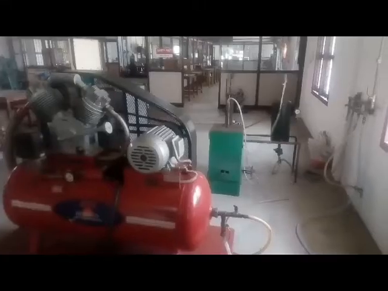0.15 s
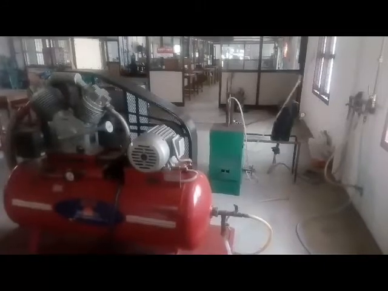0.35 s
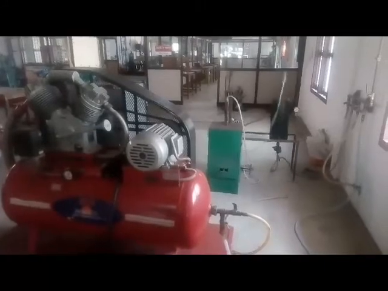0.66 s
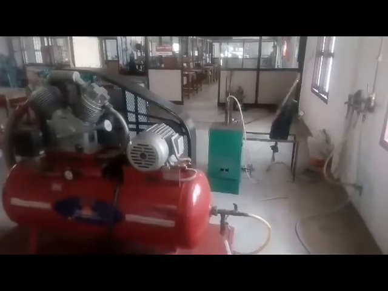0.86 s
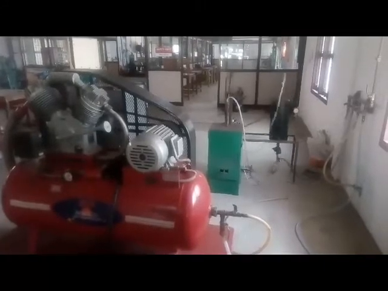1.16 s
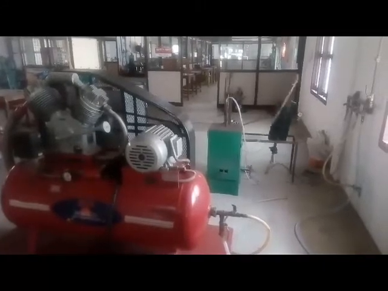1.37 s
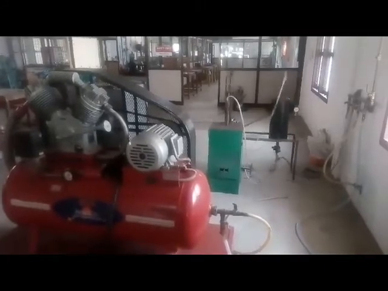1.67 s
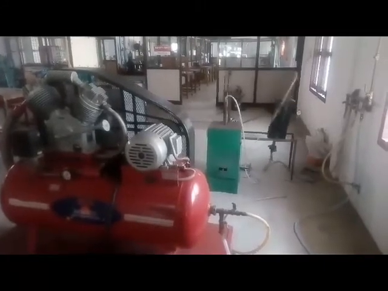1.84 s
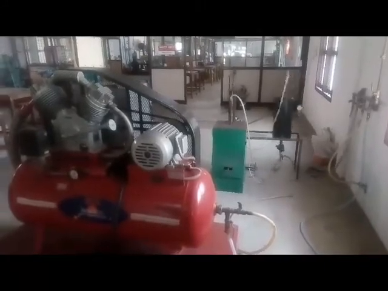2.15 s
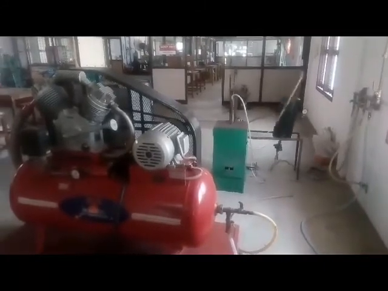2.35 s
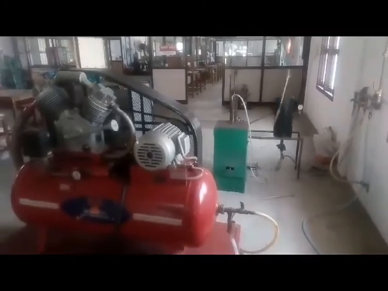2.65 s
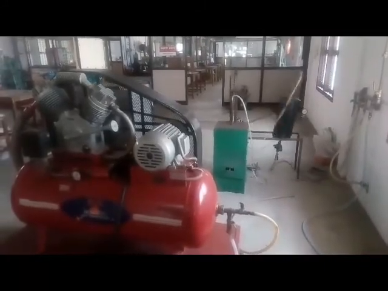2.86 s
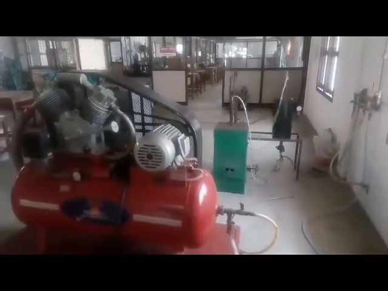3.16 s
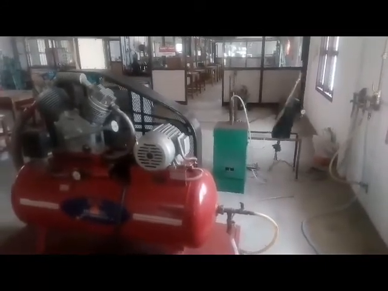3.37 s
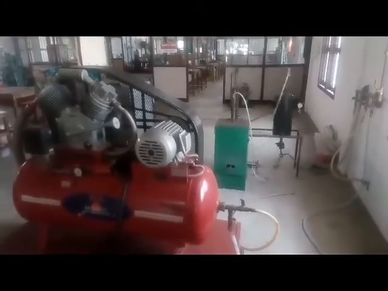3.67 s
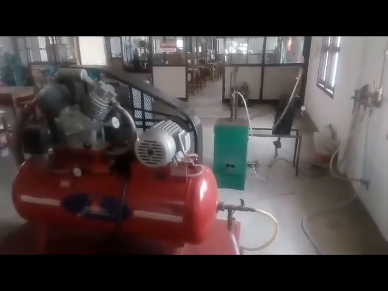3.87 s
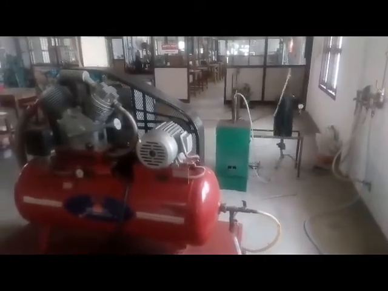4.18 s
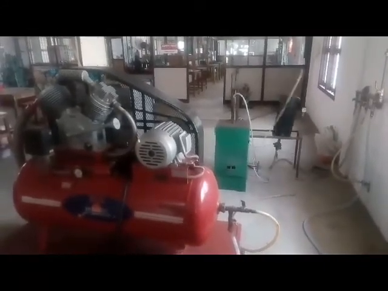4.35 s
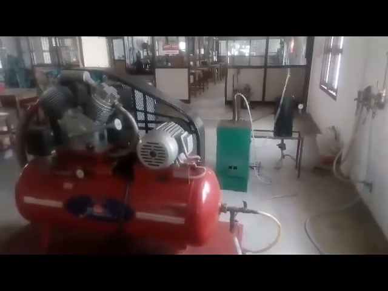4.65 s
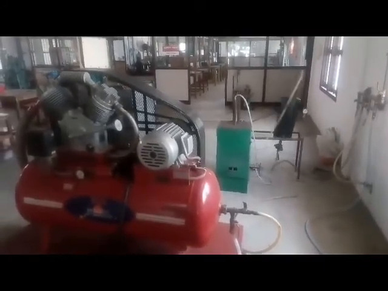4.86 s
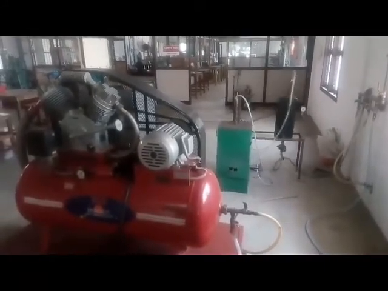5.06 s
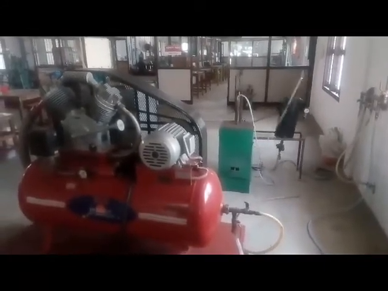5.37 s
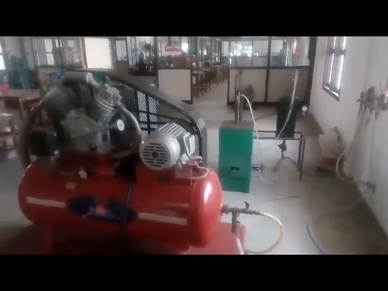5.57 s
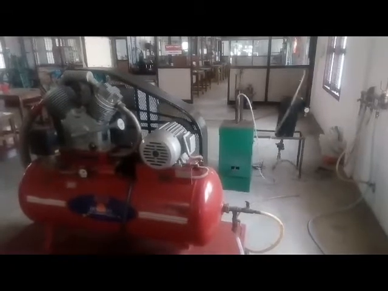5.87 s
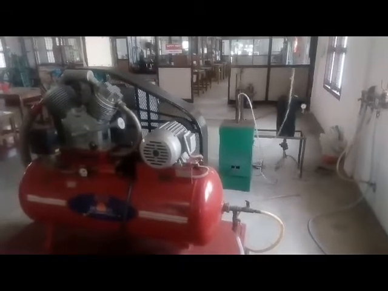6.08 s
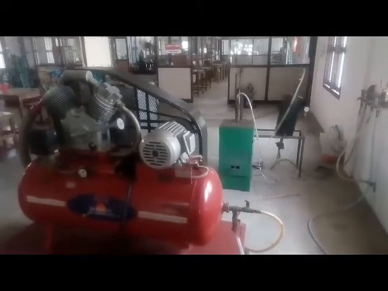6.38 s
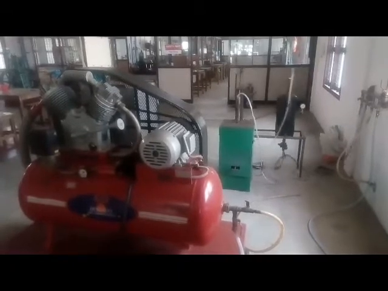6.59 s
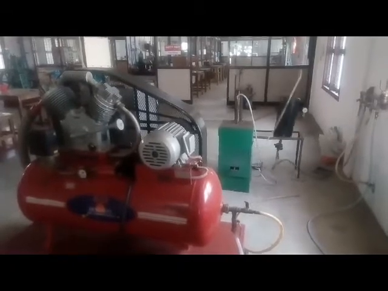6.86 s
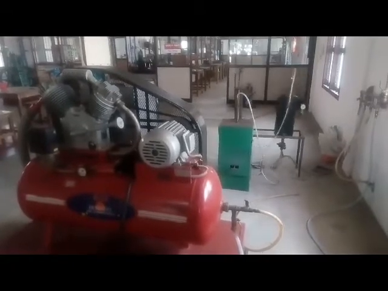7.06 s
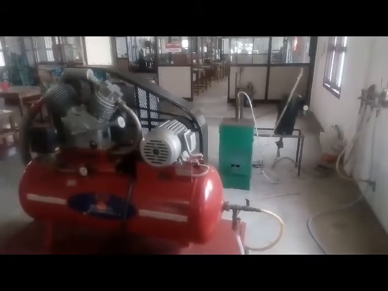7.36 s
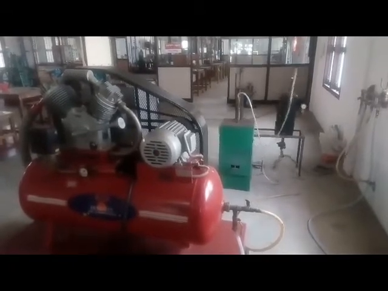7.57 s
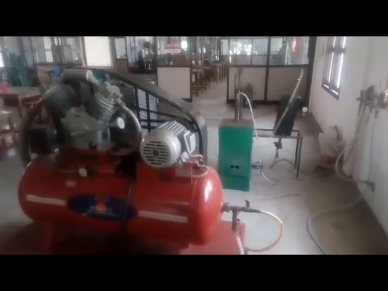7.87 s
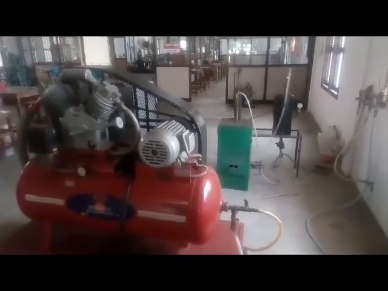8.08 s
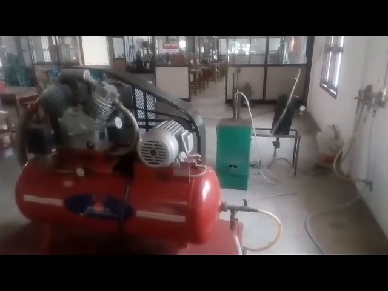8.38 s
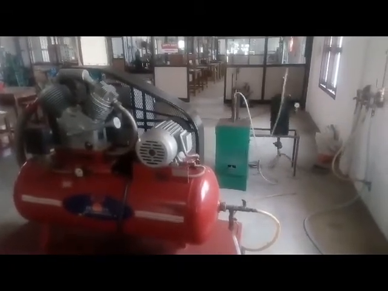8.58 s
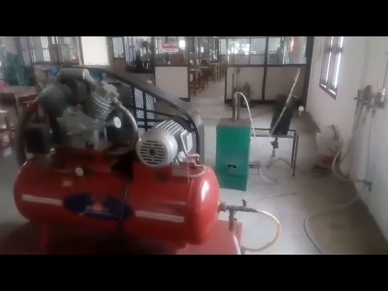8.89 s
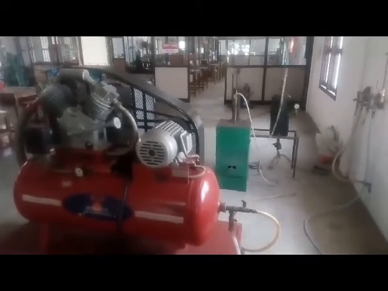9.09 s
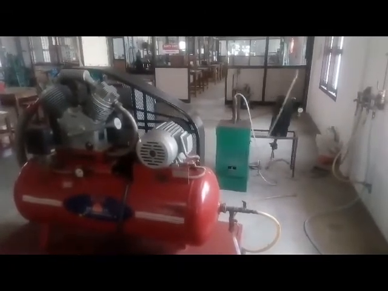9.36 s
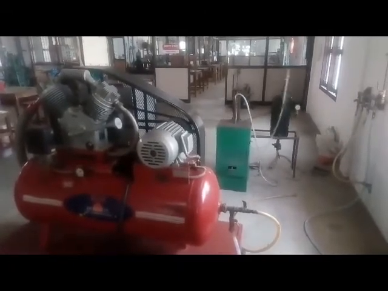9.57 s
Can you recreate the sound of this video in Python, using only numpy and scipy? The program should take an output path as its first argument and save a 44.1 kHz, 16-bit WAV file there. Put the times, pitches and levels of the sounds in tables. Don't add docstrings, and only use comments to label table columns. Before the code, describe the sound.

A belt-driven air compressor runs nonstop close by in a large hard-walled laboratory. Its slack belt taps and slaps a sheet-metal guard in a quick repeating lap: two sharp rattling taps, then a duller slap with a dragging rub. Panels boom hollowly, mesh ticks, and faint squeaks appear. Piston drone, motor hum and fan rush stay steady underneath. The sound leans left, with bright, slightly thinned treble.

```python
import sys
import numpy as np
from scipy import signal
from scipy.fft import rfft, irfft
from scipy.io import wavfile
from scipy.ndimage import uniform_filter1d

SR = 44100
rng = np.random.default_rng(int(sys.argv[2]) if len(sys.argv) > 2 else 0)


def unload_audio(sound):
    columns = np.transpose(np.atleast_2d(sound))
    steps = np.round(np.clip(columns, -1, 1) * 32767)
    wavfile.write(sys.argv[1], SR, steps.astype(np.int16))


def rack_gain(trim_db):
    fader = np.asarray(trim_db, float)
    return 10 ** (fader / 20)


N = 429093
T = np.arange(N) / SR
HZ = np.maximum(np.arange(N // 2 + 1) * SR / N, 1)

# (frequency [Hz], likeness [-1 to 1])
LIKENESS = [(40, 1), (130, 0.94), (290, 1), (630, 0.63), (900, 0.9), (1400, -0.47), (3000, 0.16),
            (14000, 0.03)]


def rms_one(x):
    return x / np.sqrt(np.mean(x ** 2) + 1e-20)


def at_hz(points, hz=HZ):
    points = np.array(points)
    return np.interp(np.log(hz), np.log(points[:, 0]), points[:, 1])


def in_time(points):
    return np.interp(T, *np.transpose(points))


def colour(x, gain):
    return irfft(rfft(x) * gain, N)


def drift(rate_hz):
    knots = rng.standard_normal(int(N / SR * rate_hz * 2) + 2)
    return np.interp(T * rate_hz * 2, np.arange(len(knots)), knots) * 2.0


def stereo(mid, side):
    alike = np.clip(at_hz(LIKENESS), -.9, .99)
    mid = colour(mid, np.sqrt(1 + alike))
    side = colour(side, np.sqrt(1 - alike))
    return np.array([mid + side, mid - side]) / 2 ** .5


def leaning(x):
    # (frequency [Hz], difference [dB])
    lean = [(60, 10), (130, 2.5), (290, 5), (630, 9), (1380, 1.5), (3010, 4.5), (6590, -2.5), (14400, 0.5)]
    half_each_way = np.array([[.5], [-.5]])
    return colour(x, rack_gain(at_hz(lean) * half_each_way))


def ring(x, hz, t60):
    r = rack_gain(-60 / (t60 * SR))
    w = 2 * np.pi * hz / SR
    return signal.lfilter([0, np.sin(w)], [1, -2 * r * np.cos(w), r * r], x)


def add(out, s, shape):
    i = max(round(s * SR), 0)
    out[i:i + len(shape)] += shape[:len(out) - i]


def lap_pattern():
    # (time [s], rattle [dB], thud [dB], clack [dB], ping [dB])
    first_taps = [(0.044, -5, -4, -20, -24), (0.539, -4, -5, -2, -28), (1.043, -6.5, -9, -1, -7),
                  (1.533, -4.5, -5, -12, -18), (2.033, -3.5, -11, -8, -12), (2.536, -6.5, -23, -19, -2.5),
                  (3.036, -6, -6, -1, -22), (3.535, -8, -12, -18, -3), (4.043, -7.5, -18, -19, -6),
                  (4.537, -6.5, -21, -22, -24), (5.044, -6.5, -5, -14.5, -11), (5.557, -6, -11, -23, -6),
                  (6.048, -7, -7, -21, -9), (6.555, -5.5, -7, -19, -16), (7.052, -8, -14, -22, -17),
                  (7.56, -8.5, -31, -20, -9), (8.062, -3, -5, -17, -26), (8.546, -9, -27, -12, -27),
                  (9.052, -3.5, -19, -16, -10), (9.543, -4.5, -24, -13, -14)]
    # (time [s], rattle [dB], thud [dB], rebound [dB])
    second_taps = [(0.103, -6, -10, -13.5), (0.592, -11.5, -6, -9), (1.096, -9, -25, -10.5),
                   (1.584, -6.5, -17, -13), (2.092, -7.5, -3, -20), (2.59, -8, -29, -27),
                   (3.086, -8.5, -29, -23), (3.589, -7.5, -11, -17), (4.094, -8.5, -22, -6),
                   (4.591, -7, -0.5, -12), (5.095, -7.5, -26, -9), (5.613, -9, -11, -13.5),
                   (6.105, -7, -22, -13), (6.61, -10.5, -19, -15), (7.105, -9, -29, -8),
                   (7.612, -9, -13, -6.5), (8.116, -9, -13, -12), (8.595, -8.5, -25, -11.5),
                   (9.106, -11.5, -23, -12), (9.596, -9.5, -13, -10)]
    # (time [s], rattle [dB], thud [dB], clack [dB], ping [dB])
    slaps = [(0.304, -13, -0.5, -8, -8), (0.799, -10.5, -7, -22, -22), (1.295, -14.5, -2, -12, -7),
             (1.793, -13, 2, -17, -6), (2.295, -12.5, -4, -14, -22), (2.794, -12, -3, -23, -10),
             (3.297, -12.5, -3, -4, -9), (3.803, -13, -1.5, -20, -18), (4.307, -11, -24, -20, -7),
             (4.801, -11.5, -14, -18, -6), (5.311, -15.5, -18.5, -7, -17), (5.819, -12, -6, -15, -9),
             (6.309, -14, -6, -15, -23), (6.818, -11, -14, -23, -2.5), (7.314, -12.5, -9, -14, -8.5),
             (7.819, -12.5, -7, -10, -14), (8.313, -14.5, -16, -19, -18), (8.805, -14.5, -11, -17, -23),
             (9.308, -14, -20, -6.5, -14)]
    # (time [s], rattle [dB], panel boom [dB])
    slap_rubs = [(0.373, -6.5, -4), (0.866, -7.5, -32), (1.319, -6, -25), (1.37, -8.5, -1),
                 (1.88, -6.5, -23), (2.362, -8, -19), (2.881, -7.5, -17), (3.405, -10.5, -29),
                 (3.887, -6.5, -23), (3.943, -8.5, -13), (4.392, -6.5, -17), (4.883, -6, -18),
                 (5.369, -14.5, -18), (5.416, -7.5, -19), (5.454, -13, -22), (5.915, -7.5, -16),
                 (6.379, -8.5, -21), (6.46, -9.5, -11), (6.913, -7.5, -30), (7.377, -10.5, -15),
                 (7.415, -11, -12), (7.907, -9.5, -20), (7.977, -14, -14), (8.397, -5, -7),
                 (8.865, -8, -18), (8.908, -8.5, -15), (9.381, -5, -23)]
    chance_db = 3.5
    boom_db = (-19.5, -23, -11)
    second_ring_db = (-19, -16)
    rebound_s, rebound_boom_db = 0.045, 1.5
    flutter_s, flutter_db, flutter_boom_db = .058, -10, -34

    knocks = []
    for contact, rows in enumerate((first_taps, second_taps, slaps)):
        for row, luck in zip(rows, chance_db * rng.standard_normal((len(rows), 3))):
            clack_db, ping_db = luck[1:] + second_ring_db if rows is second_taps else row[3:]
            knocks.append((row[0], row[1], boom_db[contact] + luck[0], row[2], ping_db, clack_db, contact))

    rubs = slap_rubs + [(s + rebound_s, db, db + rebound_boom_db) for s, _, _, db in second_taps]
    luck = chance_db * rng.standard_normal((len(rubs), 2))
    rubs += [(s + flutter_s, db + flutter_db + a, flutter_boom_db + b)
             for (s, db, _), (a, b) in zip(rubs, luck)]
    return np.array(knocks), rubs


def contact_force(knocks, rubs, column, knock_s, rub_rise_s, rub_fall_s, bright=0, dull=False):
    # (brightness [dB], drag below the knock [dB], drag length [s])
    contacts = [
        (8, -16.5, 0.15),
        (1, -5.5, 0.063),
        (-3, -1.5, 0.11),
    ]
    power = np.zeros(N)
    t = T[:SR // 4]
    for row in knocks:
        bright_db, drag_db, drag_s = contacts[int(row[-1])]
        drag = 1 / (1 + (t / drag_s) ** 4)
        knock = drag if dull else rack_gain(bright * bright_db) * np.exp(-t / knock_s) + rack_gain(drag_db) * drag
        onset = 1 - np.exp(-t / .0018)
        add(power, row[0] - .0012, (rack_gain(row[column]) * onset * knock) ** 2)
    from_peak = t - 3 * rub_rise_s
    rub = np.exp(-np.where(from_peak < 0, from_peak / rub_rise_s, from_peak / rub_fall_s) ** 2)
    for row in rubs:
        add(power, row[0] - 3 * rub_rise_s, (rack_gain(row[column] - 2.5) * rub) ** 2)
    return np.sqrt(power)


def chatter(per_s, spread_db):
    sizes = rack_gain(spread_db * np.minimum(rng.exponential(1, N), 3)) * rng.choice([-1, 1], N)
    hits = rng.random(N) < per_s / SR
    return rms_one(sizes * hits + 1e-9)


def struck(force, modes, per_s):
    out = np.zeros((2, N))
    spots = [force * chatter(per_s, spread_db=3.0) for _ in range(4)]
    for k, (hz, left_db, right_db, t60) in enumerate(modes):
        alike = np.clip(at_hz(LIKENESS, hz), 0, 1)
        t60 = min(t60, .08)
        flare = rack_gain(1.3 * drift(12))
        here = ring(spots[k % 4] * flare, hz, t60) / np.sqrt(t60 * SR)
        if hz < 3200:
            unlike = np.roll(here, int(SR / hz / 4))
        else:
            unlike = np.roll(here, 3 + 2 * k) * (-1) ** k
        there = alike * here + np.sqrt(1 - alike ** 2) * unlike
        out += [rack_gain(left_db) * here, rack_gain(right_db) * there]
    return out


def guard(knocks, rubs):
    # (pitch [Hz], left [dB], right [dB], time to fall 60 dB [s])
    panels = [(723, -1.5, -1, 0.11), (760, -2.5, -6, 0.069), (812, -16, -7.5, 0.032), (1010, -5, -25, 0.01),
              (1507, -6.5, -18, 0.069), (1521, -1, -8, 0.086), (1544, 0, -4.5, 0.097)]
    # (pitch [Hz], left [dB], right [dB], time to fall 60 dB [s])
    mesh = [(1795, -8.5, -15, 0.023), (1954, -3.5, -18, 0.026), (2280, -2.5, -16, 0.046),
            (2664, 1, -8.5, 0.029), (2740, -1, -13, 0.011), (2790, -25, -5, 0.034),
            (2980, -28, -19.5, 0.023), (3384, -11.5, -6.5, 0.098), (3640, -1.5, -15, 0.019),
            (3813, -4.5, -5.5, 0.11), (3965, -9, -12, 0.024), (4186, -15, -6.5, 0.04),
            (4342, -1.5, -7, 0.029), (4780, -7, -11, 0.054), (5140, -9, -39, 0.029), (5430, -19, -14, 0.11)]
    # (frequency [Hz], level per Hz [dB])
    rattle_spectrum = [(290, -69), (500, -21), (646, -20.5), (765, 2.5), (1060, -13.5), (1510, -5),
                       (1670, -7), (2670, -9), (4450, -6.5), (6430, -14.5), (8190, -28), (12900, -32.5),
                       (14900, -45)]
    boom = np.hypot(contact_force(knocks, rubs, 2, .005, 0.0056, 0.023, dull=True), rack_gain(-20.0))
    rattle = np.hypot(contact_force(knocks, rubs, 1, 0.014, 0.019, 0.023), rack_gain(-25.0))
    sizzle = np.hypot(contact_force(knocks, rubs, 1, 0.011, 0.00089, 0.03, bright=0.98), rack_gain(-22.5))

    clicks = np.array([chatter(2500., spread_db=3.5), chatter(4000., spread_db=4.5)])
    treble = 1 / (1 + (6500 / HZ) ** 8)
    shape = rack_gain(at_hz(rattle_spectrum))
    shape = shape / np.sqrt(np.mean(shape ** 2))
    clatter = rack_gain(-7) * colour(rattle * rack_gain(1.24 * drift(50)) * clicks, shape * (1 - treble))
    clatter = clatter + rack_gain(-1.64) * colour(sizzle * clicks, shape * treble)
    left, right = stereo(*clatter)
    right = 1.065 * right + 0.24 * np.roll(left, 3)

    metal = leaning(np.array([left, right]))
    metal = metal + rack_gain(-2.0) * struck(boom, panels, 900.)
    return metal + rack_gain(1.68) * struck(rattle, mesh, 800.)


def blows(rows, modes, spread_db):
    out = np.zeros((2, N))
    at = (rows[:, 0] * SR).astype(int) - 55
    for k, (hz, level_db, t60, column) in enumerate(modes):
        clicks = np.zeros((2, N))
        luck_db = spread_db * rng.standard_normal((len(at), 2)).T
        clicks[:, at] = rack_gain(rows[:, column] + level_db + luck_db)
        clicks[1] = np.roll(clicks[1], 2 if hz < 1000 else int(SR / hz / 4)) * rack_gain(-11)
        build_s = .016 if hz > 1000 else .009
        swell = ring(clicks, hz, build_s) * 2 * np.log(1000) / (build_s * SR)
        out += ring(swell, hz, t60)
    return out


def touches(rows, gain_db, rise_s, fall_s, right_db, crack_db=-40):
    out = np.zeros((2, N))
    t = T[:SR // 8]
    shape = (1 - np.exp(-t / rise_s)) * np.exp(-t / fall_s)
    shape = shape / shape.max()
    band = signal.butter(2, [1800, 9000], "band", fs=SR, output="sos")
    noise = signal.sosfilt(band, rng.standard_normal((2, N)))
    for s, level_db, hz in rows:
        tone = np.sin(2 * np.pi * hz * t)
        for side, lean_db in enumerate((0, right_db)):
            burst = rack_gain(crack_db) * noise[side, int(s * SR):][:len(t)]
            n = len(burst)
            touch = rack_gain(level_db + gain_db + lean_db) * shape[:n] * (tone[:n] + burst)
            add(out[side], s + side * 3 / SR, touch)
    return out


def squeaks():
    # (time [s], level [dB])
    squeals = [(0.037, -33), (1.524, -20), (2.02, -20), (2.083, -18), (2.525, -15.5), (2.578, -33),
               (4.032, -15), (4.403, -32), (4.526, -21), (5.132, -26), (6.03, -23), (6.533, -25),
               (7.032, -24), (8.044, -32), (9.526, -22), (9.622, -18)]
    pitch_hz, fall_hz, length_s = 4345, 50, 0.018
    out = np.zeros(N)
    t = T[:SR // 10] - .05
    sag = fall_hz * length_s * np.exp(-(t + 0.013) / length_s / 2)
    whistle = np.exp(-(t / length_s) ** 2 / 2) * np.sin(2 * np.pi * (pitch_hz * t - sag))
    for s, level_db in squeals:
        if s > .05:
            add(out, s - .05, rack_gain(level_db - 1) * whistle)
    out = out * rack_gain(1.5 * drift(60))
    return np.array([out, np.roll(out, 3)])


def pump():
    # (time [s], turns per second [Hz])
    crank = [(0, 15.403), (5, 15.401), (9.73, 15.385)]
    # (multiple of crank rate, level [dB rms])
    strokes = [(4, -54), (6, -47), (7, -49), (8, -41.5), (9, -54), (10, -59), (12, -44), (14, -59),
               (16, -42.5), (17, -45), (18, -26), (19, -54), (21, -50), (22, -32.5), (23, -40), (28, -39.5),
               (29, -39), (30, -43)]
    # (pitch [Hz], width [Hz], level [dB rms])
    tank = [(278.6, 12, -36), (351.6, 10.4, -37), (335, 17, -51.5), (459, 15, -44.5), (241.5, 20, -42),
            (184, 48, -44)]
    # (time [s], level [dB])
    surge = [(0, -31), (1.7, -25), (2.35, -39), (2.5, -27.5), (8, -30), (8.5, -41), (9.73, -38)]
    turn = 2 * np.pi * np.cumsum(in_time(crank)) / SR
    out = 0
    for order, level_db in strokes:
        level = rack_gain(level_db - 1.5 + 1.2 * drift(6.0))
        out = out + level * np.sin(order * turn + 7 * rng.random() + 0.07 * drift(4.4))
    for hz, level_db in ((294.5, -43), (354.8, -1 + in_time(surge))):
        out = out + rack_gain(level_db + 2.3 * drift(8)) * np.sin(2 * np.pi * hz * T + .75 * drift(5))
    for hz, width_hz, level_db in tank:
        out = out + rack_gain(level_db) * rms_one(ring(rng.standard_normal(N), hz, 2.2 / width_hz))
    return leaning(stereo(out, np.roll(out, 170)))


def fan():
    # (frequency [Hz], level per Hz [dB])
    air_spectrum = [(20, -34), (46, -33), (100, -17.5), (200, -18), (277, -2.5), (500, -11), (750, -11),
                    (1200, -12), (1670, -5.5), (2670, -6), (6480, -26.5), (7870, -31.5), (13300, -27.5),
                    (14900, -69)]
    mid, side = colour(rng.standard_normal((2, N)), rack_gain(at_hz(air_spectrum)))
    lumps = rack_gain(.7 * drift(6) + 1.0 * drift(30))
    return rack_gain(-23.5) * lumps * leaning(rms_one(stereo(mid, side)))


def hall(x):
    # (top of band [Hz], time to fall 60 dB [s], level [dB])
    echo_bands = [
        (860, 0.64, -3.5),
        (4100, 1.1, -3),
        (11800, 1.2, 0),
    ]
    tail, low = 0, 0
    for top_hz, t60, level_db in echo_bands:
        below = 1 / (1 + (HZ / top_hz) ** 4)
        noise = colour(rng.standard_normal((2, N)), below - low)
        decay = rack_gain(level_db - 60 * T / t60) * np.sqrt(2 * np.log(1000) / t60 / SR)
        tail = tail + noise * decay * (T > .008)
        low = below
    return irfft(rfft(x) * rfft(stereo(*tail)), N)


def starved_treble(x, margin_db, follow, scatter_db):
    shift, patch_lines = 140, 8
    f, t, z = signal.stft(np.pad(x, ((0, 0), (shift, 0))), SR, "cosine", 2048, 1024)
    first = int(6900 / f[1])
    count = (len(f) - first) // patch_lines
    last = first + count * patch_lines
    patches = z[:, first:last].reshape(2, count, patch_lines, -1)
    level_db = 10 * np.log10(np.mean(np.abs(patches) ** 2, axis=(0, 2)) + 1e-20)

    luck = uniform_filter1d(rng.standard_normal(level_db.shape), size=2, axis=1)
    luck = rms_one(luck + uniform_filter1d(luck, size=5, axis=0))
    band = np.arange(count)[:, None]
    edge_db = 5 * np.exp(-band / 1.5) - .9 * np.maximum(band - 37, 0)
    above_usual_db = level_db - np.median(level_db, axis=1, keepdims=True)
    chance = follow * above_usual_db + scatter_db * luck + edge_db
    strong = np.abs(patches) > .7 * rack_gain(level_db)[:, None]
    kept = patches * strong * (chance > margin_db)[:, None]
    z[:, first:last] = kept.reshape(2, -1, len(t))
    return signal.istft(z, SR, "cosine", 2048, 1024)[1][:, shift:shift + N]


def scene():
    # (pitch [Hz], level [dB], time to fall 60 dB [s], knock column)
    thud = [(765, -4, .03, 3), (850, -7, .03, 3), (1545, 2, .045, 4), (2630, 0, .016, 5),
            (2760, 3, .018, 5), (2900, 0, .016, 5)]
    clack = [(2290, -8, .04, 1), (3800, -6, .04, 1), (4350, -7, .04, 1), (4800, -12, .025, 1),
             (5300, -10, .025, 1)]
    # (time [s], peak level [dB], pitch [Hz])
    early_bonks = [(0.047, -7, 820), (0.164, -14, 756), (0.304, -8, 780), (0.35, -11, 786),
                   (0.385, -6.5, 772), (0.537, -15, 768), (0.598, -11.5, 780), (0.637, -17, 785),
                   (0.716, -10.5, 770), (0.799, -20, 750), (0.858, -10, 860), (0.925, -14.5, 760),
                   (1.009, -24, 810), (1.041, -9, 760), (1.103, -10, 826), (1.192, -11.5, 760),
                   (1.293, -8, 800), (1.36, -23, 746), (1.411, -12, 746), (1.531, -5, 783),
                   (1.593, -10, 846), (1.789, -6, 795), (1.821, -6, 770), (1.899, -17, 770),
                   (2.032, -6.5, 768), (2.093, -12, 760), (2.124, -5, 756), (2.293, -6.5, 772),
                   (2.326, -7, 768), (2.373, -8, 735), (2.429, -20, 830), (2.532, -21, 798),
                   (2.584, -21, 775), (2.629, -20, 817), (2.792, -5.5, 764), (2.832, -15, 728),
                   (2.892, -8, 717), (2.932, -10.5, 750), (2.963, -28, 760), (2.998, -15, 748),
                   (3.035, -8, 782), (3.125, -9, 760)]
    middle_bonks = [(3.296, -14, 800), (3.352, -6.5, 732), (3.394, -11.5, 714), (3.59, -16, 750),
                    (3.626, -15, 803), (3.802, -11, 785), (3.854, -8, 803), (3.915, -20, 755),
                    (3.954, -14, 821), (4.04, -5, 783), (4.081, -20, 770), (4.136, -16, 756),
                    (4.164, -15, 770), (4.315, -17, 770), (4.386, -9, 783), (4.54, -17, 745),
                    (4.591, -15, 770), (4.798, -7, 798), (4.852, -3.5, 760), (4.933, -9, 755),
                    (5.043, -12, 770), (5.127, -7, 781), (5.312, -15, 790), (5.348, -21, 845),
                    (5.403, -11, 757), (5.458, -12.5, 725), (5.556, -6.5, 792), (5.614, 0, 746),
                    (5.668, -12, 761), (5.819, -10.5, 784), (5.877, -5, 711), (5.958, -11.5, 754),
                    (6.038, -17, 770), (6.107, -14, 766), (6.145, -13, 730), (6.31, -5, 753),
                    (6.378, -16, 765), (6.556, -10, 830), (6.59, -6.5, 760), (6.629, -16, 770),
                    (6.655, -9, 780), (6.691, -19, 750), (6.75, -18, 775), (6.794, -28, 781)]
    late_bonks = [(6.816, -12, 778), (6.862, -14, 755), (6.891, -12, 688), (7.053, -9.5, 762),
                  (7.202, -14.5, 778), (7.286, -18, 784), (7.314, -12.5, 703), (7.369, -9, 735),
                  (7.41, -7, 748), (7.559, -26, 786), (7.619, -18, 810), (7.654, -25, 764),
                  (7.693, -11.5, 747), (7.767, -21, 837), (7.818, -13, 778), (7.869, -10, 760),
                  (7.966, -11.5, 724), (8.061, -12, 812), (8.116, -10, 706), (8.174, -17, 756),
                  (8.253, -19, 785), (8.287, -13, 736), (8.312, -8, 800), (8.369, -6, 770),
                  (8.414, -9, 770), (8.45, -17, 794), (8.557, -17, 730), (8.635, -13, 770),
                  (8.678, -13.5, 776), (8.745, -18, 820), (8.806, -17, 790), (8.874, -6, 764),
                  (8.935, -15, 750), (8.97, -20, 697), (9.043, -20, 753), (9.105, -15, 693),
                  (9.167, -15, 754), (9.276, -30, 770), (9.307, -27, 760), (9.54, -34, 760),
                  (9.581, -15, 713), (9.632, -14, 703)]
    # (time [s], peak level [dB], pitch [Hz])
    ticks = [(0.0453, -6, 4650), (0.1002, -3, 4260), (0.3053, -7, 3020), (0.5422, -1, 2680),
             (0.5883, -7, 2730), (0.796, -8, 2600), (1.0435, -12, 2880), (1.0968, 0.5, 4160),
             (1.2964, -12, 2520), (1.5337, -7, 3700), (1.5858, -8, 2680), (1.7887, -6.5, 2680),
             (2.0335, -4, 2860), (2.0905, -4, 3200), (2.2946, -6.5, 2880), (2.5366, -8, 3700),
             (2.59, 0.5, 3180), (2.7926, -9, 2650), (3.037, -9, 2700), (3.088, -2.5, 3770),
             (3.2981, -6.5, 2650), (3.536, -12, 2660), (3.5897, -17, 2730), (3.7998, -7, 2670),
             (3.8831, -7, 2780), (4.0442, 1, 4320), (4.0927, -5.5, 2900), (4.308, -7, 4180),
             (4.592, 0, 4700), (4.7992, -7, 2310), (5.0445, -15, 2800), (5.096, -1, 3880),
             (5.3153, -10, 2870), (5.366, -1, 2790), (5.5564, -4, 3850), (5.6128, -7, 4500),
             (5.8176, -13, 2320), (5.903, -10, 3680), (6.107, -12, 3660), (6.317, -9, 2790),
             (6.4522, -6, 4340), (6.556, -8, 2680), (6.6088, -5.5, 2940), (7.0521, -6, 3800),
             (7.1019, -10, 3870), (7.3181, -4, 2740), (7.3721, -5, 2620), (7.5584, -2, 2610),
             (7.6206, -6, 4550), (7.8176, -7, 2680), (8.0631, -13, 3940), (8.118, -3, 2720),
             (8.5443, -6, 3970), (8.597, -4.5, 2630), (8.8081, -9.5, 2780), (9.0527, -3, 2650),
             (9.109, -2, 2790), (9.3087, -18, 2830), (9.5457, -9, 2690), (9.598, -7, 2720)]
    # (time [s], peak level [dB], pitch [Hz])
    rub_ticks = [(0.3898, -2, 2710), (0.8594, -9, 2780), (1.3496, -11, 2750), (2.3587, -3, 2710),
                 (2.8784, -11, 2700), (4.3878, -5, 2790), (6.91, -2, 2690), (8.3703, -8, 2780),
                 (8.879, -9, 2670)]
    bonks = early_bonks + middle_bonks + late_bonks

    knocks, rubs = lap_pattern()
    metal = guard(knocks, rubs)
    metal = metal + blows(knocks, thud, spread_db=2.0) + blows(knocks, clack, spread_db=3.0)
    metal += squeaks()
    metal += touches(bonks, gain_db=-3.5, rise_s=0.0015, fall_s=0.018, right_db=-3)
    metal += touches(ticks + rub_ticks, gain_db=-7, rise_s=0.0006, fall_s=0.0061, right_db=-3, crack_db=-2.5)
    return metal + hall(metal) + pump() + fan()


def low_pass(x):
    return signal.sosfilt(signal.butter(12, 15010, fs=SR, output="sos"), x)


def record(dry):
    # (time [s], level [dB])
    fade_in = [(0, -10.5), (.05, -7.5), (.11, -4.5), (.2, -0.5), (9.73, 0)]
    x = colour(dry * rack_gain(in_time(fade_in)), 1 / (1 + (35 / HZ) ** 2))
    x = x / (1 + np.abs(x / .96) ** 8) ** (1 / 8)
    x = colour(x, 1 / (1 + (HZ / 14400) ** 90))
    x = starved_treble(x, margin_db=2.4, follow=.7, scatter_db=4.)
    return low_pass(x)


dry = scene()
out = record(dry)
unload_audio(out)
```